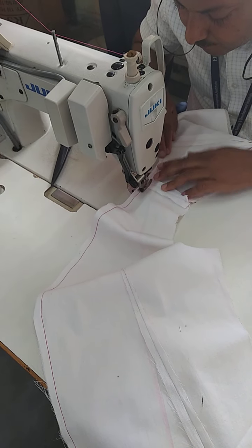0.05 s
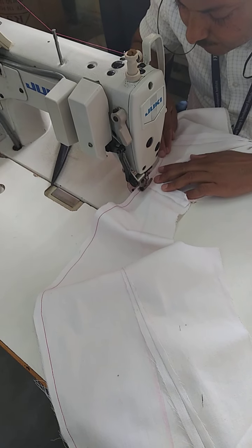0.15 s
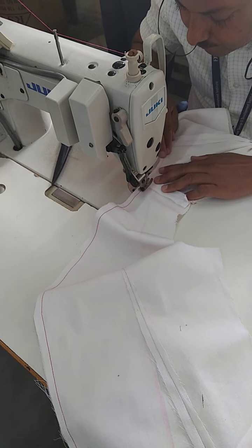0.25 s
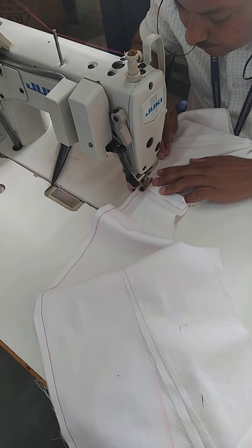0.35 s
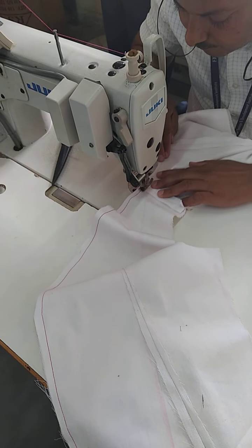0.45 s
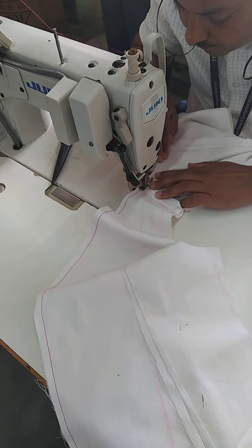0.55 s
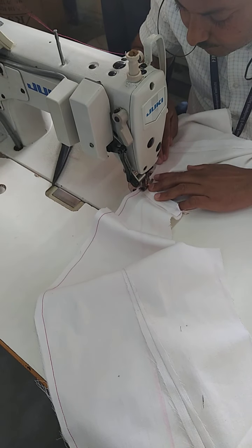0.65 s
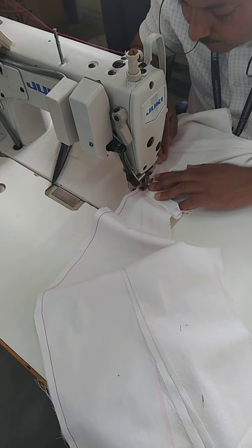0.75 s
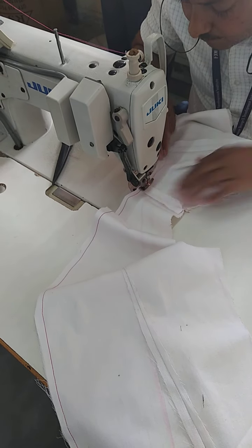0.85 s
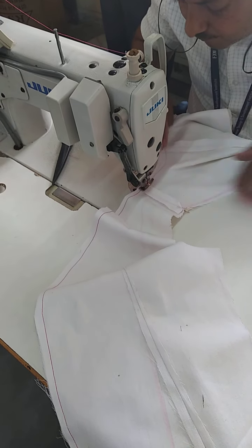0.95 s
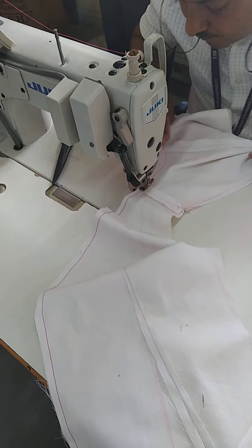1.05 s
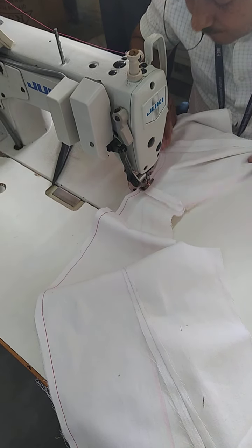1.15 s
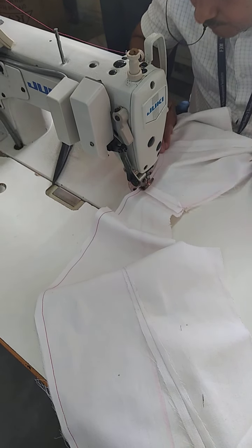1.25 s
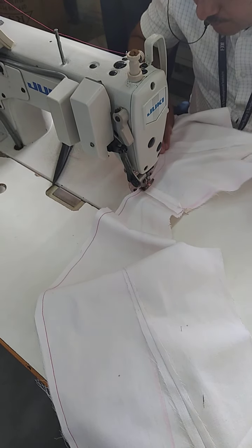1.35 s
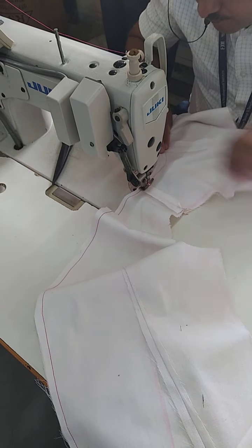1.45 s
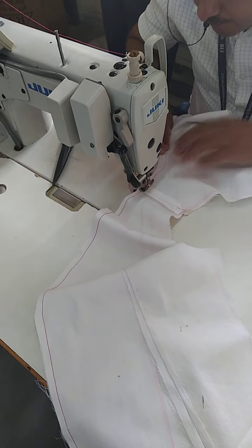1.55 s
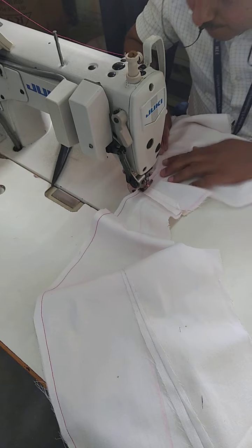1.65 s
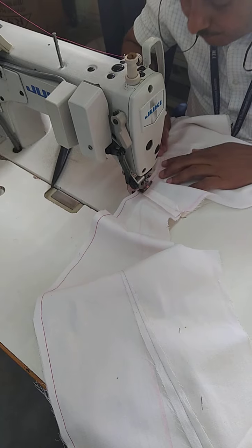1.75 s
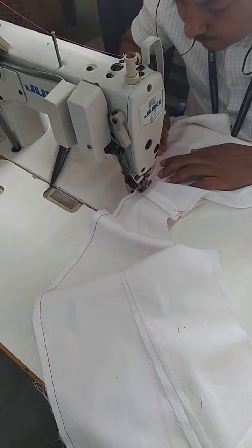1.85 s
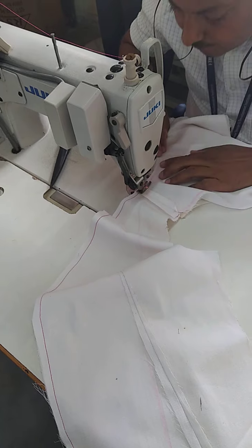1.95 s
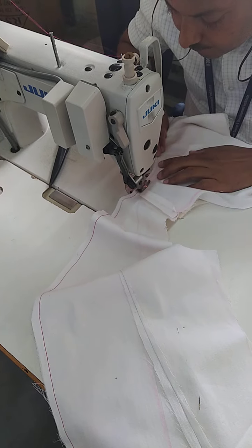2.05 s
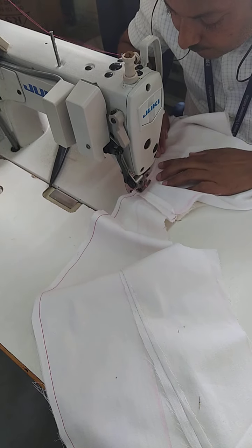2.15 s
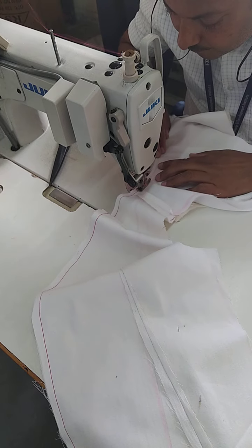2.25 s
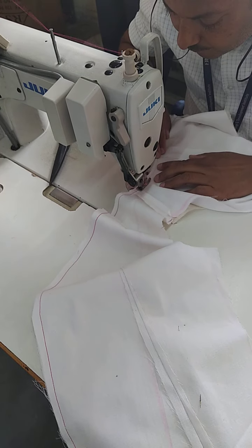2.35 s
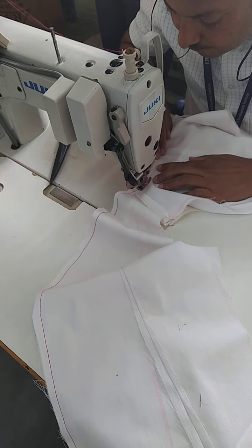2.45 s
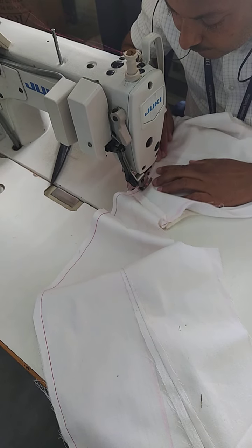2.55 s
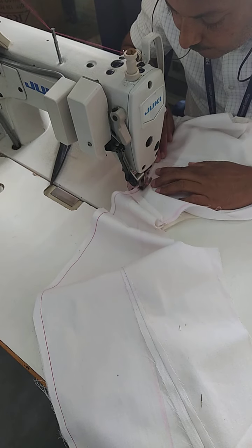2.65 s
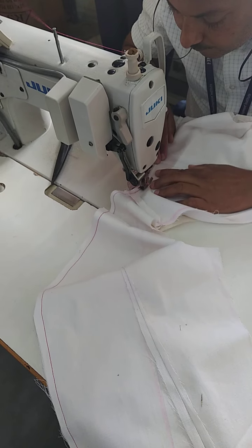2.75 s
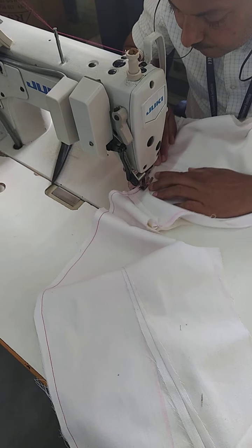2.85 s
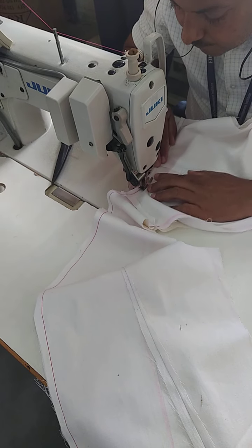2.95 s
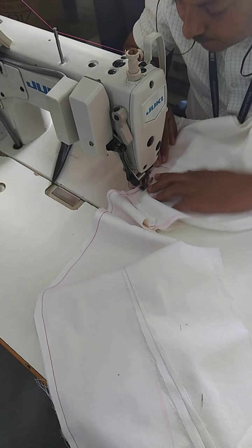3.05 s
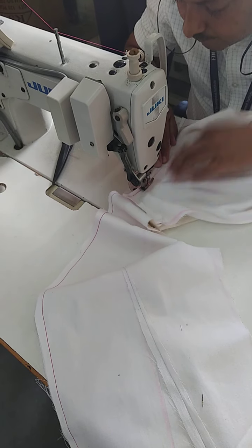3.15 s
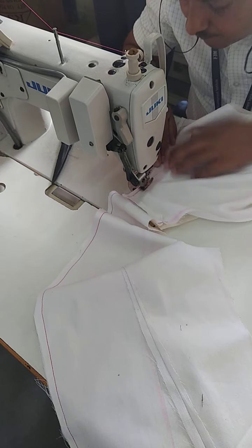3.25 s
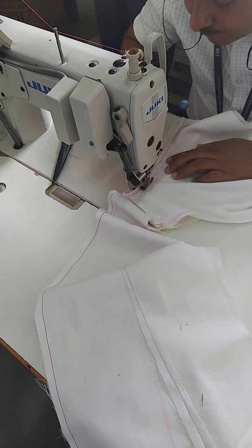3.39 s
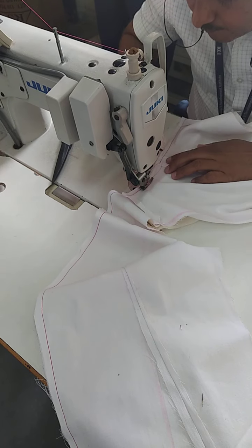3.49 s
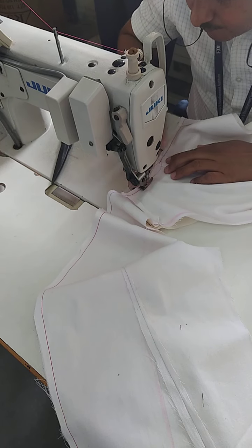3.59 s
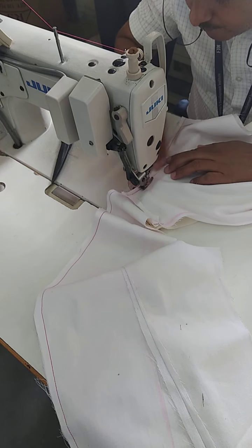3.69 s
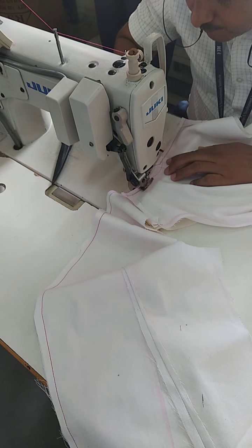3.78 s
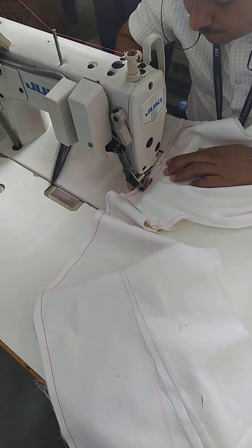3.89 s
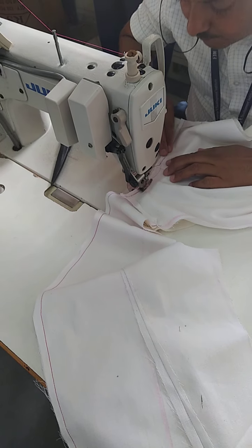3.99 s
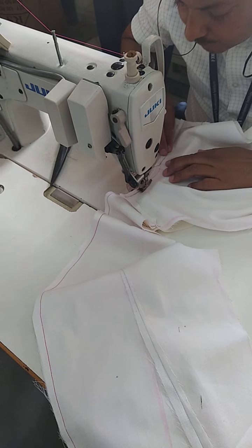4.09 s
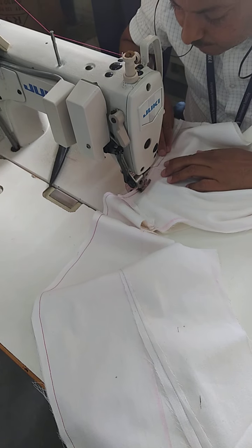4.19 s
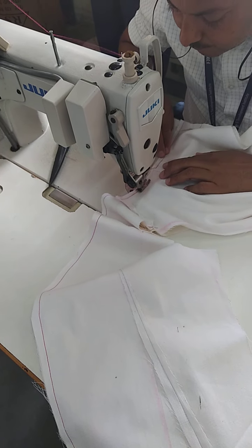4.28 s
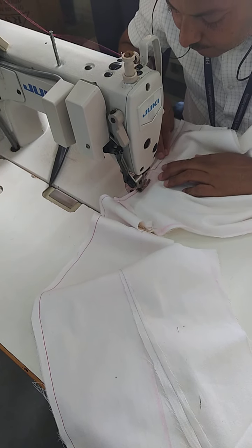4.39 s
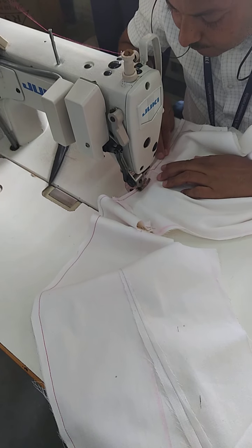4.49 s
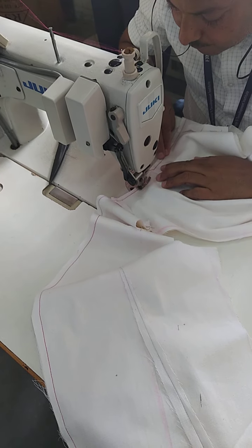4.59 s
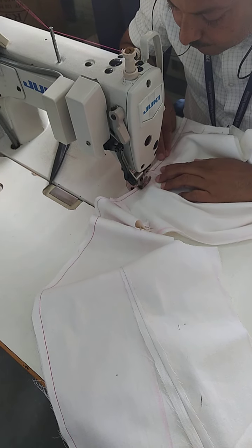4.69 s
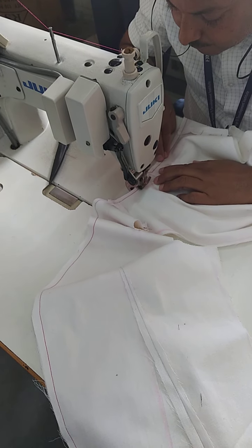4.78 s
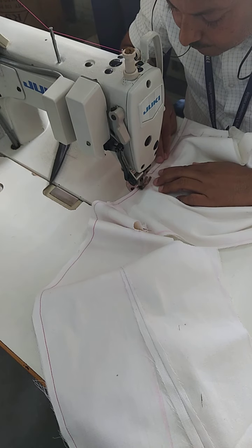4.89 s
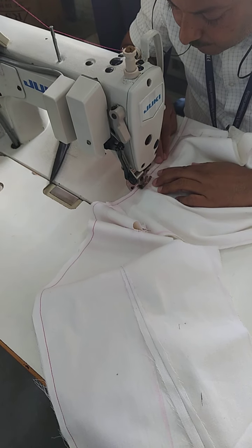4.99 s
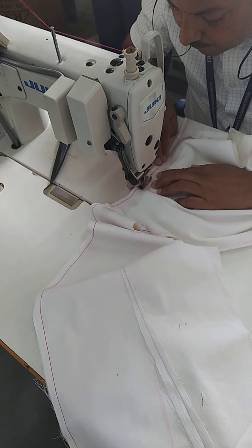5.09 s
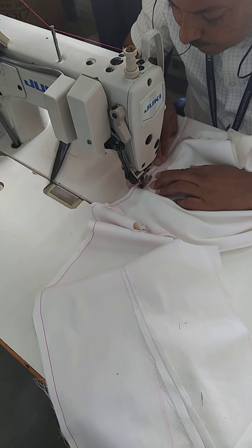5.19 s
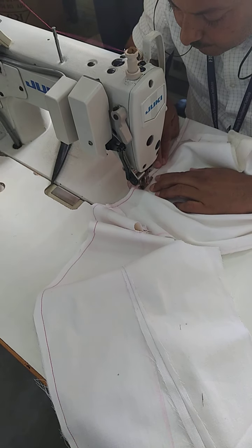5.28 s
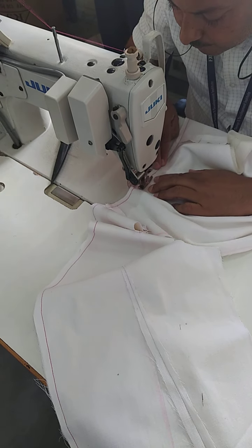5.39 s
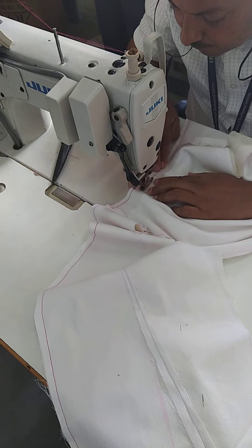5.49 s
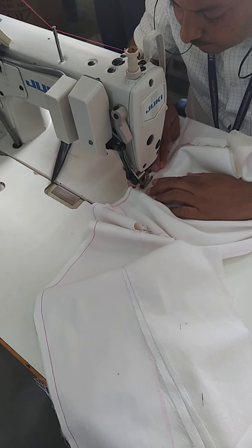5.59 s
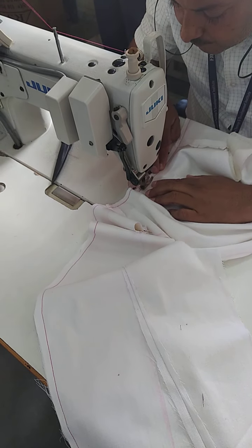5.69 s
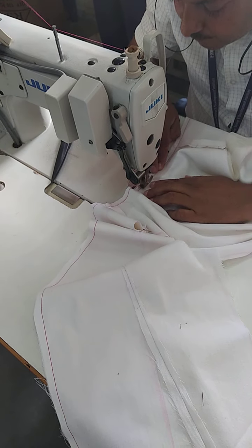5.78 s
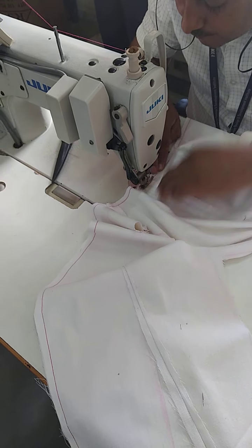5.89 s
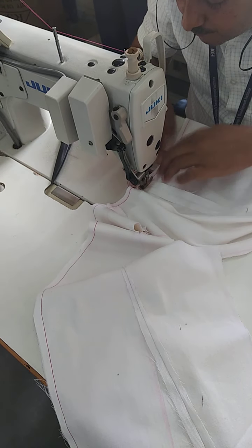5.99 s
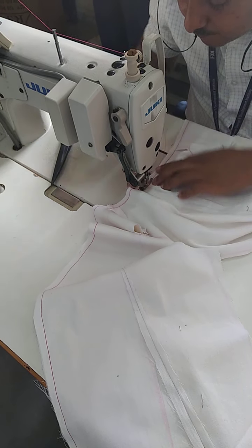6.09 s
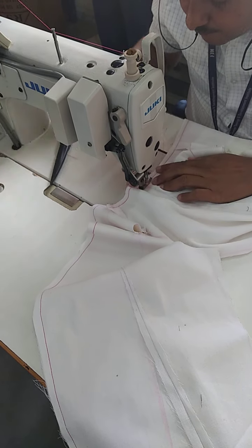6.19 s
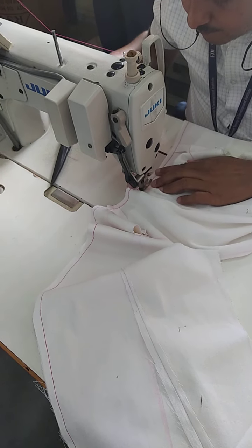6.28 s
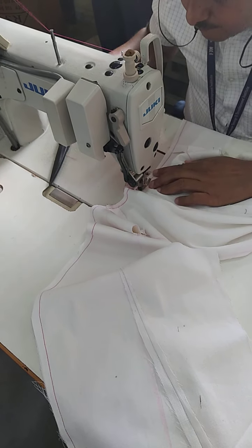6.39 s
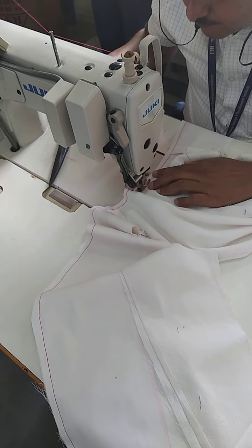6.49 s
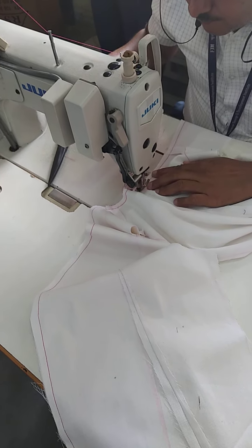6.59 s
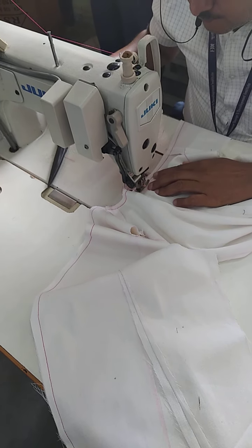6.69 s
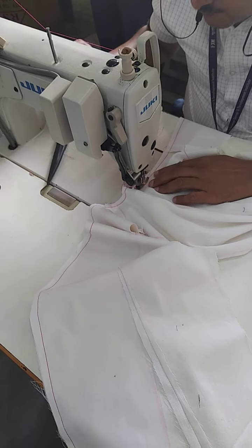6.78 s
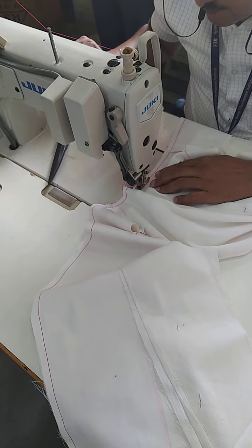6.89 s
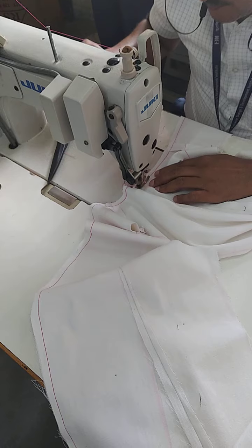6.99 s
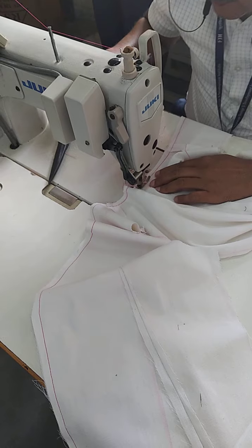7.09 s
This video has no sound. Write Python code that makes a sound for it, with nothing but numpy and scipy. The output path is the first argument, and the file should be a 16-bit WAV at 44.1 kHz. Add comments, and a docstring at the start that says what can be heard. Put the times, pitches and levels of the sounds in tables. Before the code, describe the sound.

Close, dry sewing machine bursts: clunk, rattling whirr, hard metallic ticks, one brief cloth squeak, then three trimmer clacks, against steady distant fan noise.

```python
"""An industrial sewing machine in a workshop runs in short bursts, two microphone ports close by.
Its hook and gears whirr as shaped noise in the cast head and table, with narrow tones under load.
The needle bar ticks in ringing modes; clutch and brake clunk as dying bursts of chatter; the cloth
scrapes and squeaks once; at the end the thread trimmer clacks three times in the same castings.
Behind it far machines and fans fill the hall with a dull, nearly steady rush of noise."""
import sys
import numpy as np
from scipy import signal
from scipy.fft import rfft, irfft, next_fast_len
from scipy.io import wavfile
from scipy.ndimage import uniform_filter1d, map_coordinates

SR = 44100
rng = np.random.default_rng(int(sys.argv[2]) if len(sys.argv) > 2 else 0)


def unload_audio(sound):
    """Save the sound as a 16-bit wav file, at the path given as the first command line argument."""
    columns = np.transpose(np.atleast_2d(sound))
    # keep every value between -1 and 1, then stretch to whole-number steps
    steps = np.round(np.clip(columns, -1, 1) * 32767)
    wavfile.write(sys.argv[1], SR, steps.astype(np.int16))


N = 314874  # length [samples]

# Steady stitching: (a needle stroke [s], a later stroke [s], strokes between, first time [s], last time [s])
STITCHING_RUNS = [(2.286, 2.404, 2, 2.1, 2.95), (4.604, 5.102, 8, 4.45, 5.8)]
# Resonances of the table: (frequency [Hz], width [Hz], level [dB])
TABLE_MODES = [(99.5, 30.4, -4), (158, 24.2, -1), (207.3, 37, -1.5), (281.7, 26.6, -0.5), (348, 31.5, -3)]
# Starts of the motor: (clutch bites [s], jolt level [dB], bite to jolt's peak [s], pedal tick level [dB],
# table ring level [dB], bed ring level [dB])
MOTOR_STARTS = [(.2644, -29, 0.051, -46, -42, -37), (1.958, -45, 0.042, -47.5, -52.5, -49),
                (4.16, -37.5, 0.054, -52, -46.5, -50.5), (6.2235, -35, 0.051, -54, -49.5, -43)]


def whirr():
    """Hook and gears rattle, shake the cast head, and the head shakes the table; each stroke adds a throb."""
    # Spectrum of the rattle: (frequency [Hz], density [dB per Hz])
    rattle_spectrum = [(1500, -20.5), (3400, -14), (4100, -5.5), (4700, -5), (5350, -0.5), (5900, -2),
                       (6500, -1.5), (7500, -4.5), (8300, -17), (11000, -21), (13000, -23), (15000, -29.5)]
    # Resonances of the cast head: (frequency [Hz], width [Hz], level [dB])
    head_modes = [(595, 190, -3.5), (771, 140, 0.5), (825, 73, 2), (1267, 200, -3), (1742, 190, -5.5),
                  (1990, 135, -3), (2409, 51, -3), (3102, 340, -7.5)]
    # Effort of the running machine, one curve a burst, the last under the trimmer: (time [s], rattle level [dB])
    effort_curves = [
        [(.25, -65), (.28, -39), (.31, -30), (.41, -31), (.44, -38), (.5, -36.5), (.575, -49), (.67, -56),
         (.8, -69), (.9, -84)],
        [(1.95, -75), (1.99, -38.5), (2.045, -39), (2.08, -43.5), (2.2, -46.5), (2.4, -50.5), (2.85, -51.5),
         (3.0, -63.5), (3.2, -79.5)],
        [(4.14, -72), (4.18, -34.5), (4.21, -32.5), (4.32, -34.5), (4.44, -40.5), (4.49, -50.5), (5.5, -50.5),
         (5.74, -53.5), (5.86, -58.5), (6.0, -81)],
        [(6.21, -70.5), (6.245, -38), (6.29, -31.5), (6.37, -31), (6.4, -41.5), (6.44, -42), (6.48, -49),
         (6.6, -53), (6.8, -78)],
        [(6.882, -46), (6.905, -34), (6.93, -37.5), (6.995, -39.5), (7.01, -51.5), (7.045, -36.5), (7.075, -53),
         (7.095, -58), (7.115, -33), (7.14, -33.5)],
    ]
    steady_db = -51  # rattle at a steady run
    head_db, head_grows = -51, 0.71  # level at a steady run, dB per dB of effort
    table_db, table_grows = -58.5, 0.58
    jolt_table_db = -8  # the jolt in the table, over that in the head
    flutter_db, flutter_rate = .6, 45  # size, knots per second

    rattle = sum(gains(rows)[0] for rows in effort_curves)
    effort = rattle / amp(steady_db)
    start_jolt = jolt()
    head = np.hypot(amp(head_db) * effort ** head_grows, start_jolt)
    table = np.hypot(amp(table_db) * effort ** table_grows, amp(jolt_table_db) * start_jolt)

    beat = strokes()
    flutter = amp(flutter_db * wobble(flutter_rate))
    knocking = knocks() * rush(patchy_db=1.6, grain_db=1.5)
    fine = filtered(knocking, lambda hz: amp(along(rattle_spectrum, hz)[0]))
    body = wandering(head_modes)
    # the squared response doubles each table level in dB
    thrum = filtered(rush(patchy_db=0.0, grain_db=1.2), lambda hz: resonances(TABLE_MODES)(hz) ** 2)

    rattle_sound = rattle * amp(2.3 * beat) * unit(fine)
    head_sound = head * amp(0.5 * beat) * unit(body)
    table_sound = table * amp(0.6 * beat) * unit(thrum)
    return flutter * (rattle_sound + head_sound) + table_sound


def strokes():
    """A pulse of height 1 at every needle stroke while stitching is steady."""
    t = np.arange(N) / SR
    out = np.zeros(N)
    for s0, s1, count, first, last in STITCHING_RUNS:
        turn = 2 * np.pi * count * (t - s0 - .003) / (s1 - s0)  # the throb comes 3 ms after the stroke
        out += ((t > first) & (t < last)) * np.exp(5 * (np.cos(turn) - 1))
    return out


def jolt():
    """The swell that each start sends through the machine, at its level where u is 1."""
    t = np.arange(N) / SR
    out = np.zeros(N)
    for bite, db, peak_s, *_ in MOTOR_STARTS:
        u = np.maximum(t - bite, 0) / peak_s
        out += amp(db) * (u * np.exp(1 - u)) ** 3
    return out


def knocks():
    """A gain with sudden uneven bumps where loose parts knock at random."""
    rate, decay_s, largest = 500, .0008, .65  # per second, decay [s], largest bump over a base of 1
    hits = (rng.random(N) < rate / SR) * rng.uniform(0, largest, N)
    return unit(1 + signal.lfilter([1], [1, -np.exp(-1 / (decay_s * SR))], hits))


def wandering(peaks):
    """Noise in resonances that drift by crossfading between a low and a high tuning."""
    shift, shift_rate = .035, 7  # share of the frequency, knots per second
    turn = np.pi / 4 * (1 + np.tanh(wobble(shift_rate)))
    shaken = knocks()

    def tuned(k):
        moved = [(hz * k, width, db) for hz, width, db in peaks]
        return filtered(shaken * rush(patchy_db=1.6, grain_db=1.5), resonances(moved))
    return np.cos(turn) * tuned(1 - shift) + np.sin(turn) * tuned(1 + shift)


def tones():
    """Narrow tones of gears and table under load, at each jolt, before each start and in steady stitching."""
    # Tones that sing under load: (first time [s], last time [s], pitch [Hz], blur [Hz], level [dB])
    load_tones = [(0.275, .38, 330.6, 4.8, -40), (.28, 0.482, 827.4, 3.2, -42.5),
                  (0.275, 0.408, 570, 14, -45), (0.313, 0.38, 1660, 47, -37), (0.309, .365, 2407, 43, -45),
                  (.298, .372, 3120, 60, -37), (.375, .428, 3120, 60, -36), (.292, .345, 2000, 60, -38.5),
                  (.348, .388, 2030, 40, -40), (.39, .47, 2030, 60, -47), (0.35, 0.47, 5100, 400, -39),
                  (1.982, 2.215, 3110, 111, -56), (4.198, 4.272, 1780, 220, -35.5),
                  (4.241, 4.443, 208.8, 20, -46.5), (6.25, 6.298, 3050, 150, -41),
                  (6.302, 6.338, 3050, 60, -39), (6.335, 6.39, 2850, 150, -42.5),
                  (6.26, 6.385, 5900, 330, -40.5), (6.26, 6.3, 3200, 120, -43), (6.24, 6.31, 690, 50, -41),
                  (6.328, 6.385, 690, 50, -43), (6.29, 6.37, 5900, 300, -39),
                  (6.891, 6.934, 2870, 600, -35)]
    # Table and bed rings: (start after the bite [s], end after the bite [s], pitch [Hz], blur [Hz])
    jolt_tones = [(0.019, 0.11, 102, 7.8), (.01, .1, 700, 160)]
    # Tones of steady stitching: (pitch [Hz], blur [Hz], level [dB])
    steady_tones = [(597.5, 41.2, -63), (2840, 140, -66), (5220, 200, -64)]
    whine_s, whine_hz, whine_blur_hz, whine_db = .065, 10730, 55, -73  # the drive, just before the bite

    rows = list(load_tones)
    for bite, _, _, _, *ring_dbs in MOTOR_STARTS:
        for (start, end, hz, blur_hz), db in zip(jolt_tones, ring_dbs):
            rows.append((bite + start, bite + end, hz, blur_hz, db))
        rows.append((bite - whine_s, bite, whine_hz, whine_blur_hz, whine_db))
    for *_, first, last in STITCHING_RUNS:
        rows += [(first, last, *tone) for tone in steady_tones]
    return sing(rows, waver_db=2.0)


def needle_bar():
    """Each tick is a short click and a rattling tail in the bar's modes, with a soft thud in the table."""
    # Single ticks, loud and faint: (time [s], level [dB], rise [ms], brightness [dB per octave])
    tick_rows = [(.6974, -37, .6, -1), (.7288, -32, .6, -3), (.7826, -44, .8, -1), (1.923, -47, .8, 0),
                 (1.982, -38, 1.5, 0), (2.115, -36, 1.2, 0), (2.207, -30, 1.5, 0), (2.286, -16.5, 1.8, 0),
                 (2.2973, -21, 1, 0), (2.4022, -36, 1, 0), (3.1155, -50, .8, 0), (4.199, -22, 1.5, 0),
                 (4.2468, -6, .6, 1), (4.257, -30, 1, 9), (4.2942, -3, .5, 1), (4.3437, -7, 1.5, 0),
                 (4.3555, -30, 1, 9), (4.402, -8, 1.4, 1), (4.5372, -16.5, 1, 0), (4.551, -29.5, 1, 0),
                 (4.604, -20.5, 1, 0), (4.6663, -32.5, 1, 0), (4.981, -35, 1, 1), (5.0421, -23, .5, 1),
                 (5.1035, -40, 1, 0), (6.01, -56, 1, 0)]
    # Modes of the bar: (frequency [Hz], level [dB], 60 dB decay before stretching [s])
    bar_modes = [(2320, -16, 0.019), (2850, -10, 0.025), (3480, -10, 0.022), (4100, -7, .024),
                 (4656, -1, 0.029), (5427, 1, 0.03), (6220, 5.5, 0.026), (7430, 3.5, 0.023),
                 (8980, -8.5, 0.037), (10500, -10, 0.021), (12700, -16.5, 0.018), (14500, -20, .012)]
    # Pedal ticks: (lead before the bite [s], level over the start's pedal tick [dB])
    pedal_ticks = [(0.032, 1), (.019, -6.5)]
    rebound_s, rebound_db, rebound_dull_db = .0026, -9, -10  # delay, level, brightness change per octave
    thud_db, thud_grows = -34.5, 0.52  # level at a 0 dB tick, dB per dB of tick

    t = np.arange(SR // 10) / SR
    thud = amp(-60 * t / 0.037) * (1 - np.exp(-t / 0.006)) * np.cos(2 * np.pi * TABLE_MODES[2][0] * t)
    ticks = list(tick_rows)
    for s, db, rise_ms, bright_db in tick_rows:
        ticks.append((s + rebound_s, db + rebound_db, rise_ms, bright_db + rebound_dull_db))
    for bite, _, _, pedal_db, *_ in MOTOR_STARTS:
        ticks += [(bite - early, pedal_db + db, .8, 0) for early, db in pedal_ticks]

    out = np.zeros((2, N + SR))
    pivot_hz = bar_modes[5][0]  # brightness tilts the modes about this one
    for s, db, rise_ms, bright_db in ticks:
        bar = [(hz, level + bright_db * np.log2(hz / pivot_hz), t60) for hz, level, t60 in bar_modes]
        click = ring(bar, stretch=.26, smear=.03, rise=rise_ms * 1e-3, scatter=6)
        # a click is mostly alike in both ports, the tail less so
        click = [[1.5], [.15]] * click / np.abs(click).max(axis=1, keepdims=True)
        tail = ring(bar, stretch=.9, smear=0.22, rise=rise_ms * 1e-3, scatter=6)
        tail = [[.3], [.22]] * tail / np.abs(tail).max(axis=1, keepdims=True)
        add(out, s, amp(db) * (0.64 * click + tail))
        add(out, s, amp(thud_db + thud_grows * db) * thud[None])
    return out[:, :N]


def clunks():
    """Clutch, brake and trimmer blows: dying chatter in casting, bed and needle plate; the frame rings on."""
    # Clutch and brake clunks: (time [s], level [dB], bed share [dB], treble [dB], rise [ms])
    clunk_rows = [(0.264, -34, -3, -14, 2), (0.6319, -38, -2, -4, 0.73), (1.957, -49.5, -0.5, -7, .7),
                  (2.9562, -43, -4, -7, 0.56), (3.0392, -58.5, 2, 3, 1.2), (3.1147, -56.5, -2, -15, 0.97),
                  (4.164, -46, -11, -5.5, 4.8), (5.82, -42.5, -0.5, -5, 1.1), (5.903, -58, -4, -13, 1),
                  (6.2175, -45, -4, -15, 0.96), (6.239, -38, -4, -4, 1), (6.5564, -33, -4.5, -8, .6),
                  (6.563, -43, -2.5, 6, 1.7), (6.6587, -43, -3, -15, 1.1)]
    # Trimmer clacks: (time [s], level [dB], lead-in tick level [dB])
    trimmer_clacks = [(6.8829, -15.5, -46.5), (7.0271, -21, -47), (7.104, -18, -54)]
    # Resonances of casting, bed and needle plate: (frequency [Hz], width [Hz], level [dB])
    casting_modes = [(1294, 47, 6.5), (1910, 140, 4), (2460, 400, 2.5), (2730, 1020, -1.5), (4080, 330, -2)]
    bed_modes = [(199.6, 290, -8.5), (490, 260, -1), (737, 325, -0.5)]
    plate_modes = [(4840, 280, 3.5), (6550, 1930, -3.5), (7370, 170, 5.5), (8330, 500, -12.5),
                   (12000, 6600, -23)]
    # What a blow rings in the frame: (frequency [Hz], level [dB], 60 dB decay [s])
    frame_modes = [(699.5, -10, .09), (1340, -11.5, .12), (1825, -0.5, .04), (2410, -9.5, .1),
                   (2655, -5.5, 0.061), (3890, -10, .05), (4410, -6, .08), (4770, -8, .09), (5280, -5, .04),
                   (5600, -9, .065), (6630, -10, .07), (7540, -8, 0.073)]
    clunk_t60_s, trim_t60_s = 0.085, 0.063
    trim_bed_db, trim_treble_db, trim_rise_s = -14.5, -2.5, 0.00083
    lead_s, lead_bed_db, lead_treble_db, lead_rise_s = 0.0051, -4, 12, 0.00048  # tick before each clack
    crack_db, crack_s = 4, 0.0018  # the first instant of a blow stands over its chatter
    ring_db = -3  # ringing over the blow

    blows = [(s, db, bed_db, treble_db, clunk_t60_s, rise_ms / 1000)
             for s, db, bed_db, treble_db, rise_ms in clunk_rows]
    for s, db, lead_db in trimmer_clacks:
        blows.append((s, db, trim_bed_db, trim_treble_db, trim_t60_s, trim_rise_s))
        blows.append((s - lead_s, lead_db, lead_bed_db, lead_treble_db, trim_t60_s, lead_rise_s))

    t = np.arange(SR // 4) / SR
    force = np.zeros((3, N + SR))  # on casting, bed, plate
    rings = np.zeros((2, N + SR))
    for s, db, bed_db, treble_db, t60, rise in blows:
        decay_db = db + crack_db * np.exp(-t / crack_s) - 60 * t / t60
        burst = amp(decay_db) * (1 - np.exp(-t / rise))
        add(force, s, burst * amp([[-3], [bed_db], [treble_db - 3]]))
        # treble lifts only the frame modes above the casting's highest
        frame = [(hz, level + treble_db * (hz > casting_modes[-1][0]), decay)
                 for hz, level, decay in frame_modes]
        ringing = ring(frame, stretch=1, smear=.02, rise=rise, scatter=2)
        add(rings, s, amp(db + ring_db) * ringing * [[1], [.6]])

    out = rings[:, :N]
    for level, peaks in zip(force[:, :N], (casting_modes, bed_modes, plate_modes)):
        chatter = rush(patchy_db=.3, grain_db=1.5)
        scale = np.std(filtered(chatter, resonances(peaks)))
        out = out + filtered(level * chatter, resonances(peaks)) / scale
    return out


def cloth():
    """Cloth dragged under the foot: grainy resonant scraping with short stick-slip squeaks."""
    # The drag: (time [s], scrape level [dB])
    drag_curve = [(5.19, -58.5), (5.212, -41.5), (5.235, -35), (5.249, -32.5), (5.258, -35), (5.27, -33.5),
                  (5.297, -36.5), (5.31, -41), (5.36, -51)]
    # Resonances of the scrape: (frequency [Hz], width [Hz], level [dB])
    scrape_modes = [(2000, 1400, -4.5), (3210, 240, 0.5), (3780, 350, 1.5), (4380, 250, 4.5),
                    (4620, 700, -2), (6570, 2250, -10)]
    # Squeaks: (first time [s], last time [s], pitch [Hz], blur [Hz], level [dB])
    squeak_tones = [(5.207, 5.27, 1750, 6, -31), (5.197, 5.228, 2980, 70, -43),
                    (5.26, 5.305, 3180, 60, -41), (5.236, 5.258, 4000, 250, -33),
                    (5.275, 5.305, 4300, 150, -39)]
    scrape_right, squeak_right = 0.37, .6  # how far each leans to the right port
    grit = filtered(rush(patchy_db=1, grain_db=2), resonances(scrape_modes))
    shared, apart = gains(drag_curve)[0] * unit(grit)
    squeak = sing(squeak_tones, waver_db=1.5)[0]
    return np.array([shared + squeak, apart - scrape_right * shared - squeak_right * squeak])


def hall():
    """Far machines and fans: a dull, nearly steady rush of noise, kept below 8.1 kHz here."""
    # Spectrum of the hall: (frequency [Hz], density [dB per Hz])
    hall_spectrum = [(30, -22.5), (60, -16.5), (100, 0.5), (200, 5), (420, -1), (650, 0), (1100, -0.5),
                     (2000, -6.5), (3000, -12.5), (4000, -13.5), (5600, -16.5), (7300, -20), (8600, -34),
                     (15000, -49.8)]
    noise = rush(patchy_db=0.5, grain_db=1.0)
    far = filtered(noise, lambda hz: amp(along(hall_spectrum, hz)[0]) * (hz < 8100))
    waver_db = .3 * wobble(3) + .8 * wobble(12)
    return amp(-61.0 + waver_db) * unit(far)


def sing(rows, waver_db):
    """Tones with soft ends; the phase wanders by the blur and the level wavers."""
    out = np.zeros((2, N + SR))
    for first, last, hz, blur_hz, db in rows:
        t = np.arange(round((last - first) * SR)) / SR
        steps = rng.standard_normal((2, len(t))) * np.sqrt(2 * np.pi * abs(blur_hz) / SR)
        phase = np.cumsum(steps, axis=1) + rng.uniform(0, 2 * np.pi, (2, 1))
        fade = signal.windows.tukey(len(t), min(.7, .08 / (last - first)))
        waver = np.interp(t * 40, np.arange(64), rng.standard_normal(64))  # 40 knots a second
        level = np.sqrt(2) * amp(db) * unit(amp(waver_db * waver)) * fade
        add(out, first, level * np.sin(2 * np.pi * hz * t + phase))
    return out[:, :N]


def ring(modes, stretch, smear, rise, scatter):
    """Two unrelated ringings; smear blurs each mode to a narrow band, scatter [rad] sets them out of step."""
    t = np.arange(SR // 10) / SR
    out = 0
    for hz, db, t60 in modes:
        drift = np.cumsum(rng.normal(0, smear, (2, len(t))), axis=1) + rng.uniform(0, scatter, (2, 1))
        level = amp(db + rng.normal(0, 0.85) - 60 * t / (t60 * stretch))
        out = out + level * np.sin(2 * np.pi * hz * t + drift)
    attack = 1 - np.exp(-(t / rise) ** 2)
    return out * attack / np.linalg.norm(amp(np.array(modes)[:, 1]))


def rush(patchy_db, grain_db):
    """Two unrelated noises with patches of gain and fast grains in common."""
    z = signal.stft(rng.standard_normal((2, N)), nperseg=256)[2]
    field = uniform_filter1d(rng.standard_normal(z.shape[1:]), 4, 0)  # smooth over frequency
    field = uniform_filter1d(field, 10, 1)  # and over time
    pair = signal.istft(z * amp(patchy_db * unit(field)), nperseg=256)[1][:, :N]
    return pair * amp(grain_db * wobble(350))


def resonances(peaks):
    """Causal response of (frequency [Hz], width [Hz], level [dB]) resonances with alternating signs."""
    def response(f):
        total = 0
        for k, (center, width, db) in enumerate(peaks):
            damping = 1j * f * width
            total = total + (-1) ** k * amp(db) * damping / (center * center - f * f + damping)
        return total
    return response


def filtered(x, response):
    """x times a complex response of frequency."""
    m = next_fast_len(N + SR // 2)
    return irfft(rfft(x, m) * response(np.fft.rfftfreq(m, 1 / SR)), m)[..., :N]


def wobble(rate):
    """A smooth random curve, rate knots a second."""
    return map_coordinates(rng.standard_normal(int(N * rate / SR) + 4), [np.arange(N) * rate / SR])


def gains(rows):
    """One gain per sample for each dB column, silent outside the rows."""
    s, *cols = np.transpose(rows)
    return np.array([amp(np.interp(np.arange(N) / SR, s, c, -150, -150)) for c in cols])


def along(points, hz):
    """Columns of (frequency [Hz], value, ..) points read on a log axis."""
    f, *cols = np.transpose(points)
    return [np.interp(np.log(hz + 1), np.log(f + 1), c) for c in cols]


def add(track, s, sound):
    """Adds sound into track from time s."""
    i = round(s * SR)
    track[:, i:i + sound.shape[1]] += sound


def amp(db):
    """Amplitude of a level in dB."""
    return 10 ** (np.asarray(db) / 20)


def unit(x):
    """x scaled to an RMS of 1."""
    return x / np.sqrt(np.mean(x ** 2) + 1e-20)


def scene():
    """Row 0 is what both ports share, row 1 what differs between them."""
    # Where the machine sounds from: (frequency [Hz], lean to the left port)
    machine_lean = [(300, 0), (700, .6), (1200, -.4), (1950, .35), (2500, 0), (3100, -.5), (4200, 0),
                    (9000, .25)]
    shared, apart = whirr() + tones() + clunks()
    leaning = filtered(shared, lambda hz: along(machine_lean, hz)[0])
    machine = np.array([shared, apart + leaning])
    return machine + needle_bar() + cloth() + hall()


def record(dry):
    """The ports differ in likeness, delay and level; deep bass is cut, nothing above the band limit is kept."""
    # The two microphone ports: (frequency [Hz], likeness [0-1], left lead besides the delay [rad],
    # left over right [dB])
    port_curves = [(100, 1, -0.16, -2.5), (301.5, 0.89, 1.27, 0.5), (715, 0.79, 0.81, 3),
                   (1140, 0.91, -0.15, 1.5), (1718, 0.31, 0.066, 0), (2670, 1, -1.07, 0),
                   (3060, .8, 0.31, -4.5), (4970, 0, -0.25, -7), (7200, 0.18, 0.056, -2.5),
                   (10930, 0.1, -0.3, 6), (15000, 0.02, -1.5, 0)]
    lag_s = 0.000369  # the left port hears later
    bass_hz, bass_floor_db = 92, -10  # the bass cut and what it leaves
    top_hz = 15850  # band limit

    def bass_cut(hz):
        return np.hypot(amp(bass_floor_db), 1 / np.sqrt(1 + (bass_hz / (hz + 1)) ** 8))

    def port(sign, row):
        def response(hz):
            alike, lead, tilt_db = along(port_curves, hz)
            lag = 2 * np.pi * hz * lag_s - lead
            turn = np.arccos(np.clip(alike, 0, 1)) / 2
            share = sign * np.sin(turn) if row else np.cos(turn)
            shifted = share * amp(sign * tilt_db / 2) * np.exp(-.5j * sign * lag)
            return shifted * bass_cut(hz) * (hz < top_hz)
        return filtered(dry[row], response)
    return np.array([port(sign, 0) + port(sign, 1) for sign in (1, -1)])  # left, right


dry = scene()
out = record(dry)
unload_audio(out)
```